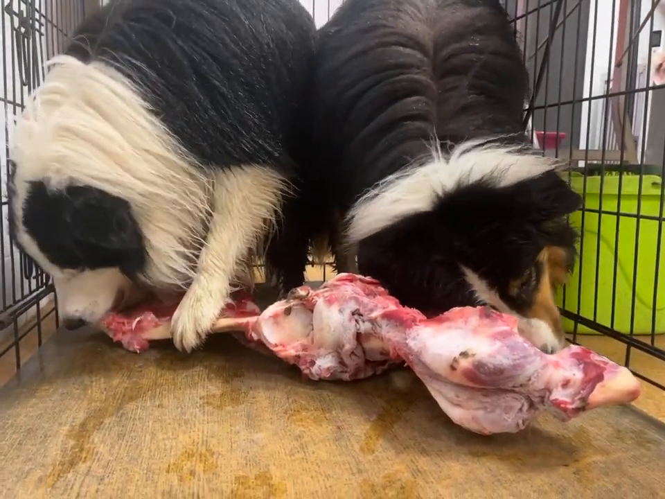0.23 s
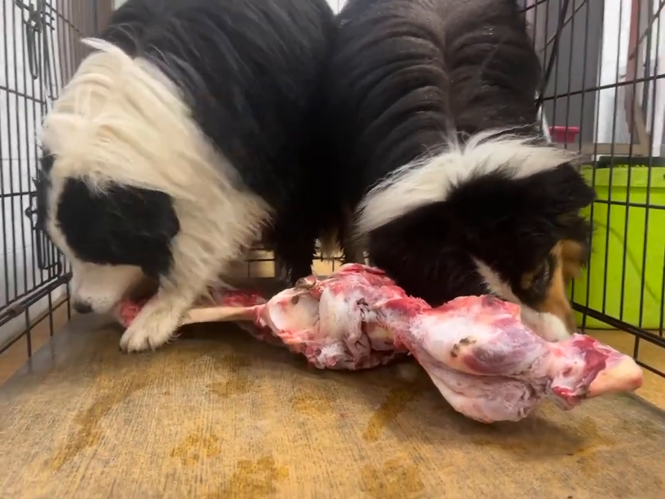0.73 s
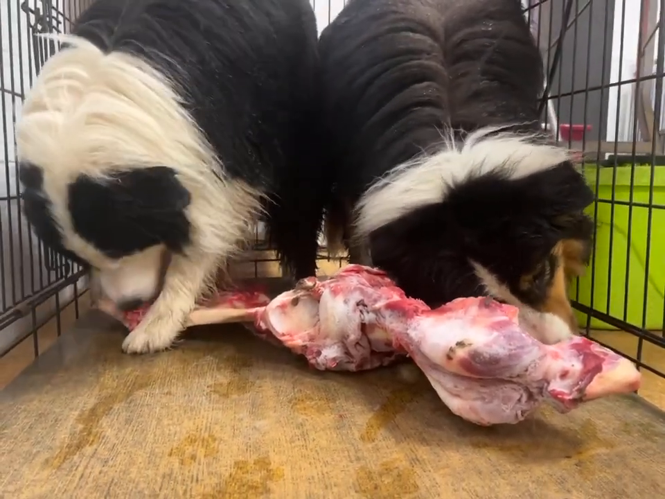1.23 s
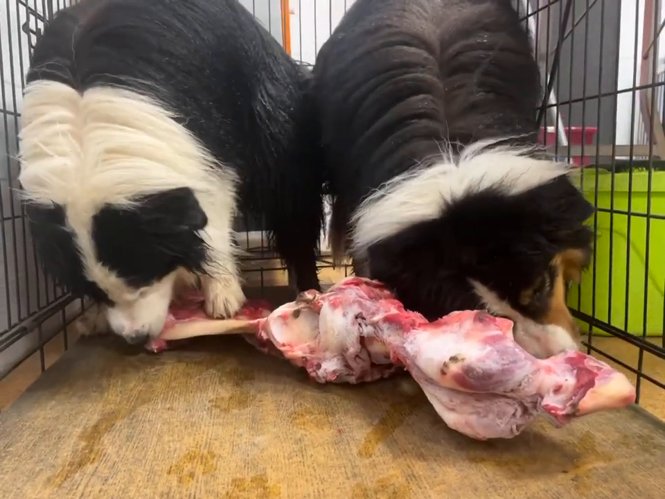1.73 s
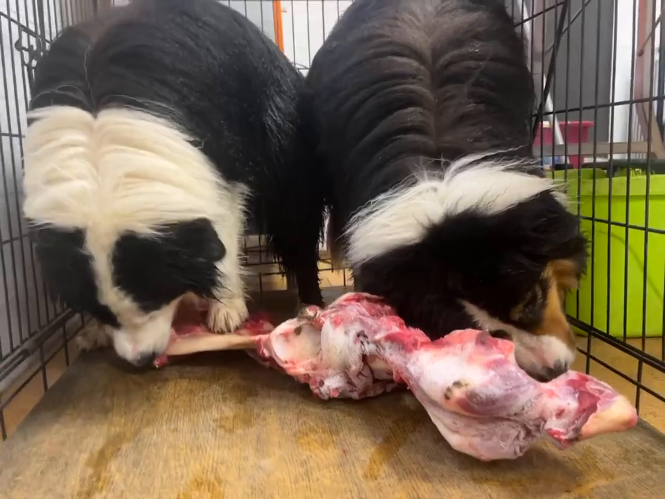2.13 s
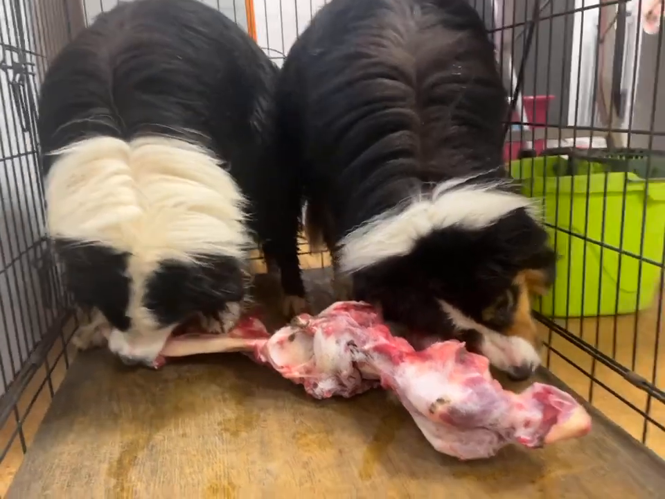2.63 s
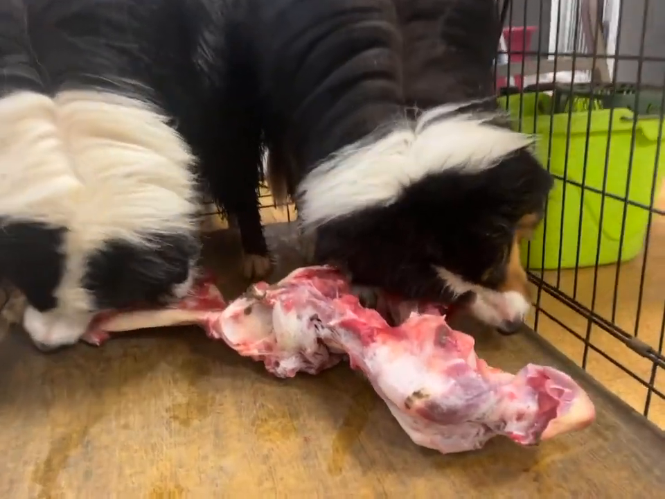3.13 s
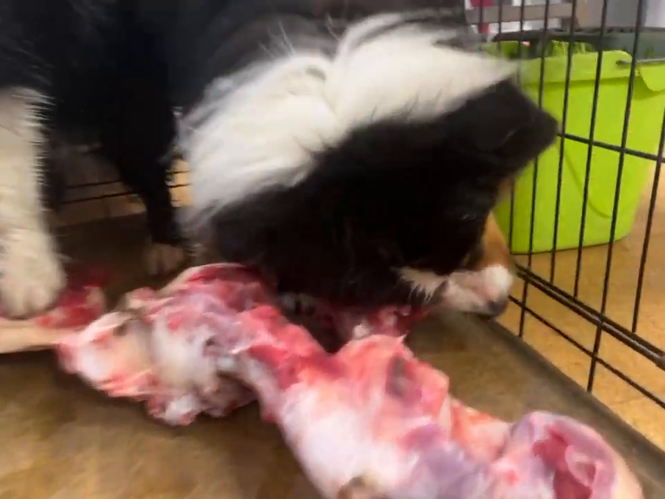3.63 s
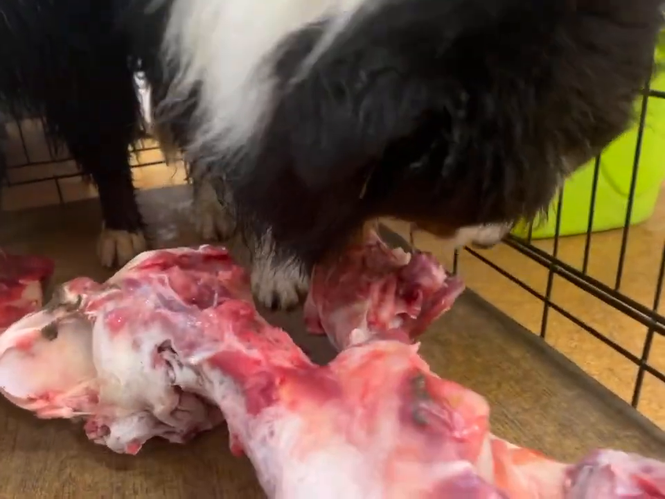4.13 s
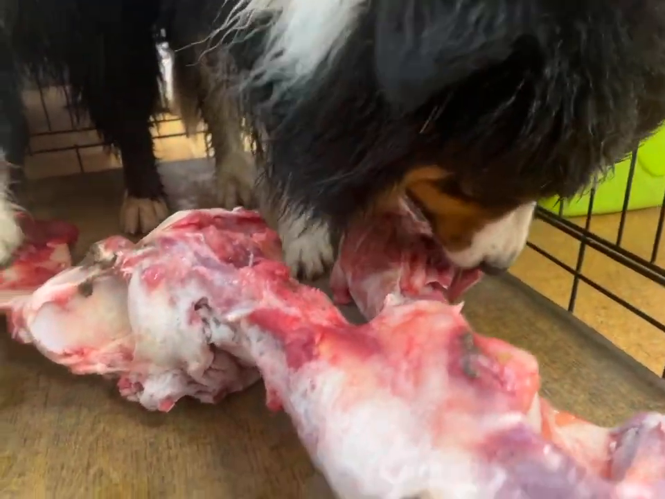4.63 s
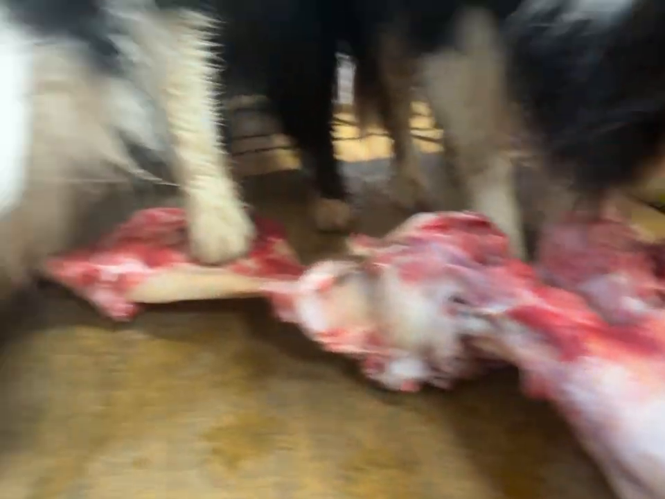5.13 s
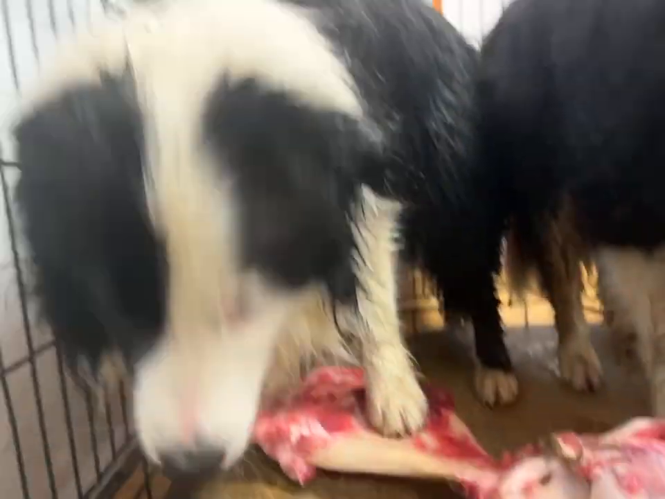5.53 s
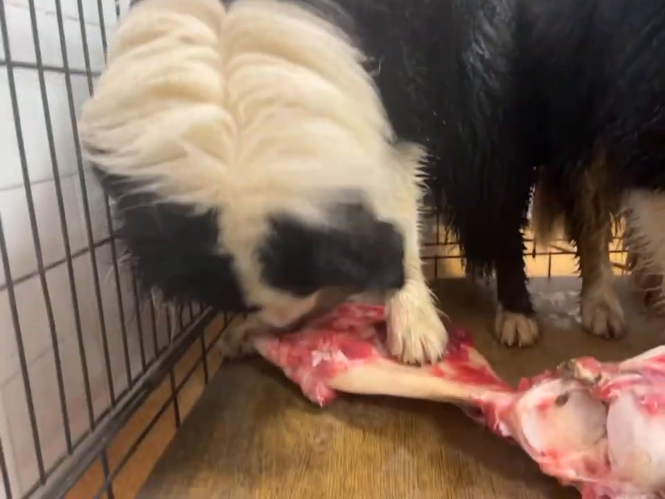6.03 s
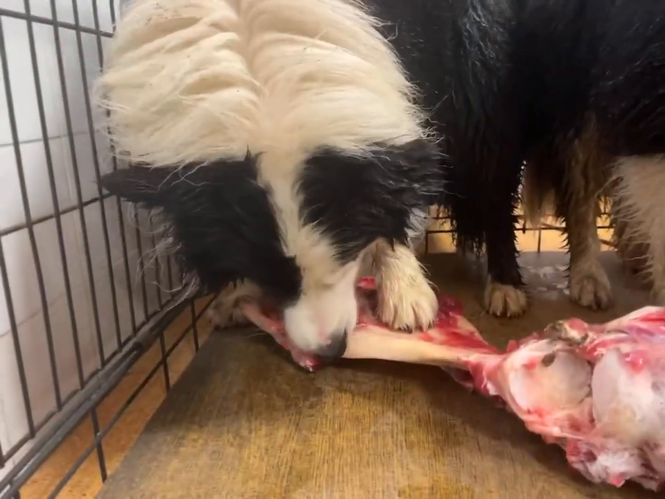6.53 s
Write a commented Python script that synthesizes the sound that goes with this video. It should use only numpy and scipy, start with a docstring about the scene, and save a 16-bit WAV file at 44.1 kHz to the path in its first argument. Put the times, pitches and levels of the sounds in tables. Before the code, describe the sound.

Heard close in a small room with a short reverberation, dogs gnaw a large raw bone on a wooden board. From 0 to 0.6 seconds small clicks and crunches lead with a sharp crack at 0.2. At about 0.7 comes the loudest cluster of bright, hard snaps, with another strong hollow clack at 1.1 and a crunch at 1.3. Irregular tooth slips continue to 2.4, with a soft bone bump near 1.7. From 2.5 to 4 there is fainter grinding, shuffling and a swell of wet, furry rubbing. At 4.1 the bone bangs loudly on the board with a crunch and a woody low ring; a lesser knock follows at 4.6. Afterwards it grows quieter: faint scrapes and ticks, then a quick flurry of dull hollow cracks at 5.9 to 6.3, a last click at 6.6 and rising rubbing. A soft low rumble persists throughout.

```python
"""Teeth slip and crack on a large raw bone that dogs gnaw on a wooden board indoors.
Slips excite dying modes of hollow, shaft and tooth edge; crunches and gnawing are grainy coloured noise.
The bone thuds on the board, whose low modes arrive last; fur and meat rub as patchy bright noise.
A low noise rumble lies beneath, and sparse decaying taps add the room to teeth and board."""
import sys
import numpy as np
from scipy import signal
from scipy.fft import rfft, irfft
from scipy.io import wavfile
from scipy.ndimage import uniform_filter1d

SR = 44100
rng = np.random.default_rng(int(sys.argv[2]) if len(sys.argv) > 2 else 0)


def dump(signal):
    """Clip the signal to [-1, 1] and save it as 16-bit WAV at the path in sys.argv[1]."""
    limited = np.clip(np.atleast_2d(signal).T, -1, 1)
    pcm = np.round(limited * 32767).astype(np.int16)
    wavfile.write(sys.argv[1], SR, pcm)


N = 299439

# teeth slipping off bone: (time [s], peak before high-pass [dB], hollow ring [Hz], hollow weight [dB],
# edge weight [dB], shaft ring [Hz], edge ring [Hz])
CRACKS = [(0.018, -32.5, 1410, -7, -34, 2700, 3410), (0.195, -29, 1440, -8, -7, 2900, 5450),
          (0.203, -16, 1454, -7.5, -6.5, 2840, 5440), (0.423, -30, 1100, -37, 0, 2400, 3180),
          (0.496, -36.5, 1070, -20, -33, 2400, 3900), (0.508, -36.5, 940, -1, -34, 2400, 3900),
          (0.6667, -13.5, 1420, -5.5, -5.5, 2420, 5360), (0.6999, -10, 1960, -16, 3, 3150, 3840),
          (0.7025, -12.5, 1792, -6.5, 2.5, 2220, 4030), (0.9, -37.5, 1250, -40, 11, 2370, 3660),
          (0.991, -35.5, 1280, -1, -25, 2400, 3900), (1.087, -32, 1350, -4, -18, 2700, 3530),
          (1.092, -23, 1336, -4, -7, 2750, 3680), (1.1043, -17.5, 1420, -3.5, -5.5, 2350, 4000),
          (1.305, -25, 1020, -20, -5.5, 3400, 4100), (1.441, -33, 1460, -15, -1, 1840, 3830),
          (1.542, -26.5, 1277, -2.5, -10, 2740, 4060), (1.5471, -22, 1225, -4.5, -9, 2730, 4230),
          (1.698, -30, 1295, -4, -6.5, 2730, 4170), (1.731, -27.5, 700, -4.5, -14, 1480, 3880),
          (1.807, -33, 1270, -10, -5.5, 2680, 3800), (1.827, -28, 1400, -4, -12, 1810, 3440),
          (1.988, -26.5, 1465, -4, -9, 2410, 3820), (2.017, -34, 1210, -7.5, -5, 2200, 5560),
          (2.215, -38, 1930, -15, -3.5, 2200, 3900), (2.225, -35.5, 1160, 2, 4, 2400, 3860),
          (2.381, -24.5, 1206, -1.5, -7.5, 2450, 3460), (2.934, -36.5, 1200, -1, -18, 2300, 3800),
          (2.944, -35.5, 1140, -8, -10, 2300, 3600), (3.212, -31.5, 1320, -10, -6, 1850, 3700),
          (3.476, -31.5, 1005, -6.5, -5, 2000, 3940), (4.033, -39, 1010, -1, -25, 1700, 3900),
          (4.576, -36.5, 860, -8.5, -22, 2000, 3930), (4.796, -40, 744, -31, 4, 2630, 4400),
          (5.095, -35.5, 935, -5, -7.5, 2280, 4200), (5.249, -45.5, 1293, -1.5, -17, 2430, 3900),
          (5.442, -39.5, 1130, -6, -8, 2500, 4400), (5.453, -35, 1370, -14.5, -5, 2690, 4300),
          (5.8059, -33.5, 1000, -20, -6.5, 2360, 3530), (5.943, -33.5, 920, -1, -1, 2400, 3350),
          (5.952, -34, 916, -3, -20, 2250, 3370), (6.078, -26.5, 1025, -4, -41, 2200, 3300),
          (6.106, -23.5, 1075, -11, -19, 2480, 3120), (6.119, -37, 1280, 0, -22, 2470, 3310),
          (6.174, -31.5, 1060, -8.5, -3.5, 2080, 3270), (6.199, -39, 1120, -18, -9, 2500, 3400),
          (6.215, -38, 1280, -11, -20, 2440, 3400), (6.264, -38, 1250, -15, -32, 2260, 3400),
          (6.641, -31, 1090, 0.5, -35, 2380, 3900)]
# modes of bone hollow: (multiple of hollow ring [1], level [dB], t60 [s])
HOLLOW_MODES = [(1, 0, .023), (1.1, -9, .012)]
# upper modes of bone shaft: (multiple of shaft ring [1], level [dB], t60 [s])
SHAFT_MODES = [(1, 0, .006), (.83, -7, .004), (1.2, -6, .004)]
# modes of tooth edge and splinters: (multiple of edge ring [1], level [dB], t60 [s])
EDGE_MODES = [(1, 0, .0034), (1.2, -6, .0024), (1.4, -8, .002), (1.8, -15, .002), (2.4, -16, .0015),
              (3.3, -21, .001)]
# dense runs of small fractures: (time [s], rms before envelope [dB], fade length [s],
# centre [Hz], width [octaves])
CRUNCHES = [(0.052, -49, 0.018, 1490, 0.81), (0.188, -42.5, 0.016, 2000, 0.95),
            (0.351, -47.5, 0.0035, 3170, 0.43), (0.282, -40.5, 0.017, 2220, 0.81),
            (0.487, -45, 0.038, 1140, 0.38), (0.648, -42, 0.023, 1400, 0.11),
            (0.651, -38, 0.019, 2720, 0.32), (0.698, -32, 0.019, 2440, 0.46),
            (1.303, -35, 0.03, 1280, 1.05), (1.67, -46.5, 0.023, 2460, 0.71),
            (2.171, -50, 0.0068, 2110, 0.2), (2.269, -52, 0.005, 2800, 0.78),
            (2.282, -59, 0.062, 1270, 0.17), (2.457, -52.5, 0.094, 3620, 1.6),
            (2.49, -55, 0.088, 1020, 0.17), (2.652, -57, 0.098, 1170, 0.13),
            (2.788, -47, 0.044, 1280, 1.86), (2.79, -42.5, 0.03, 4500, 0.51),
            (2.946, -47.5, 0.028, 1156, 0.14), (3.344, -59.5, 0.12, 1125, 0.13),
            (3.446, -55.5, 0.051, 2500, 0.97), (4.107, -42, 0.063, 2420, 1.2),
            (4.35, -52.5, 0.017, 3100, 0.66), (4.457, -52, 0.013, 4800, 0.4),
            (4.107, -34, 0.063, 870, 1.06), (4.636, -47, 0.054, 1450, 0.81),
            (4.686, -56.5, 0.074, 2210, 0.16), (4.862, -58, 0.065, 3400, 0.41),
            (5.195, -64, 0.087, 3600, 0.33), (5.445, -47, 0.015, 4430, 0.14),
            (5.755, -58.5, 0.026, 1500, 0.91), (5.801, -55, 0.081, 2420, 0.22),
            (5.799, -49.5, 0.011, 750, 0.65), (5.941, -51, 0.03, 1120, 1.4), (6.078, -36, 0.009, 880, 1.05),
            (6.104, -41, 0.018, 1400, 1.05), (6.504, -56.5, 0.08, 800, 0.74),
            (6.52, -61.5, 0.14, 3280, 0.15), (6.572, -56.5, 0.081, 1040, 0.62),
            (6.648, -55, 0.081, 1200, 0.094), (6.707, -51, 0.008, 2000, 0.3),
            (6.735, -55, 0.033, 1350, 0.53)]
# steady movement: (time [s], rumble level before swell [dB], gnawing level before swell [dB])
MOVES = [(0.0, -54.5, -63), (0.64, -54.5, -58.5), (0.98, -54, -61.5), (1.23, -52.5, -60), (2.21, -55, -61),
         (2.5, -50, -55.5), (2.7, -53.5, -58.5), (3.1, -57, -63.5), (3.38, -55, -62.5), (3.93, -57.5, -60),
         (4.18, -54, -60.5), (4.69, -52.5, -62), (5.26, -61, -69), (5.75, -63, -68.5), (6.01, -62, -67.5),
         (6.49, -61, -67), (6.79, -55, -62)]
# relative spectrum of teeth grinding on bone: (frequency [Hz], density [dB per Hz])
GNAW_SPECTRUM = [(400, -27), (520, -15.5), (644, -26), (787, -6.5), (1100, 0.5), (1600, -1.5),
                 (5000, -11.5), (8000, -60)]
# fur and meat rubbing: (time [s], level [dB])
RUBBING = [(0.0, -65.5), (0.34, -67), (0.62, -54.5), (0.87, -67.5), (1.72, -60.5), (1.9, -66), (2.5, -53),
           (2.76, -65.5), (3.65, -55.5), (4.25, -66.5), (4.52, -59), (4.78, -70), (4.92, -59), (5.3, -76.5),
           (5.46, -57), (5.73, -76.5), (5.94, -65.5), (6.4, -73), (6.58, -58.5), (6.68, -65), (6.79, -52.5)]
# relative spectrum of rubbing: (frequency [Hz], density [dB per Hz])
RUSTLE_SPECTRUM = [(880, -44), (1500, -5), (2840, -2.5), (3720, -1), (8880, -2), (15100, -8.5)]
# bone landing on board: (time [s], peak before high-pass [dB], upper-mode boost [dB],
# contact decay, floored at 1 ms [s])
THUDS = [(1.057, -41, 20, 0.02), (1.284, -42.5, 8, 0.045), (1.731, -25, -3, 0.032),
         (2.132, -44.5, -17, 0.024), (2.524, -38, -17, 0.035), (2.785, -37, 3, 0.026),
         (3.246, -36, -22, 0.024), (3.45, -44, 2, 0.084), (4.107, -5.5, 8, 0.00089),
         (4.25, -36, -10, 0.011), (4.6384, -12, -2.5, 0.0012), (4.783, -44, -3, 0.011),
         (6.366, -51, -3, 0.0082), (6.638, -41, 6, 0.0093)]
# modes of the board: (frequency [Hz], level [dB], t60 [s], signed first swing [1])
BOARD_MODES = [(60, -21, 0.11, 1), (121, -5, 0.17, -1.2), (171.5, -2, 0.13, 0.98), (226, -4, 0.09, -1.3),
               (274.6, 0, 0.16, 1), (310, -3, 0.18, 1), (366.3, -4.5, 0.19, 1), (408, -10, 0.15, 0.93),
               (516, -0.5, 0.03, 0.91), (640, -3.5, 0.022, -1.4), (825, -4, 0.048, -1.01),
               (933, -10.5, 0.04, -1), (1337, -8.5, 0.022, 0.92)]
# relative spectrum of rumble through the board: (frequency [Hz], density [dB per Hz])
RUMBLE_SPECTRUM = [(25, -24), (60, 8), (81, 7), (115, 3), (255, -6), (465, -9), (600, -7), (752, -10.5),
                   (900, -9.5), (1170, -44)]
# room decay: (frequency [Hz], t60 [s])
ROOM_DECAY = [(150, 0.29), (400, 0.65), (1040, 0.48), (2760, 0.35), (7280, 0.21)]

# tiny slips around a crack
SLIP_SHARE, CREEP_S, SLIP_S = .6, .0011, .002
# faint slips; level above gnawing
NIBBLES_PER_S, NIBBLE_DB, NIBBLE_SPREAD_DB = 9, 12.5, 3
# longer crunches are smoother and hold their level
GRAIN_SPREAD_DB, SMOOTH_S, HOLD_PER_S = 4, .13, 40
# uneven pressure of paws and jaws
SWELL_PER_S, RUMBLE_SWELL_DB, GNAW_SWELL_DB = 7, 1.8, 3.2
GNAW_PATCH_DB, RUSTLE_PATCH_DB = 3.5, 1.8
RUSTLE_PER_S, RUSTLE_DEPTH_DB = 180, 2.2
# hiss of splinters and wet meat, and its bright first puff; level re crack peak at edge weight >= 0 dB
SPRAY_DB, SPRAY_T60_S = -33, 0.26
PUFF_DB, PUFF_T60_S = -30, 0.032
SPRAY_GRAINS_PER_S, SPRAY_GRAIN_DB = 400, 4
# wet ticks; median level re rubbing, before high-pass
SPIT_PER_S, SPIT_DB, SPIT_HZ = 14, 9, 7500
# delay of a 300 Hz board mode, growth toward the bass, build-up
LAG_S, LAG_POWER, SWELL_CYCLES = .0024, 1.9, 0.26
IN_STEP_S = .0053  # common zero of board-mode phases after touch
TEETH_ROOM_DB, BOARD_ROOM_DB = -11.0, -16.5
EDGE_HZ = 15900


def cracks():
    """A clean slip amid tiny ones rings hollow, shaft and tooth edge."""
    out, t = np.zeros(N), np.arange(600) / SR
    release_s = t[90]
    rows = list(CRACKS) + nibbles()
    tiny_slips = rng.standard_normal((len(rows), 600)) * (rng.random((len(rows), 600)) < .06)
    for (s, db, hollow_hz, hollow_db, edge_db, shaft_hz, edge_hz), slips in zip(rows, tiny_slips):
        decay_s = np.where(t < release_s, CREEP_S, SLIP_S)
        drive = SLIP_SHARE * slips * np.exp(-abs(t - release_s) / decay_s)
        drive[90] = 1  # the tooth creeps, then lets go
        hollow, edge = gain_of(hollow_db), gain_of(edge_db)
        shaft = np.sqrt(max(1 - hollow ** 2 - edge ** 2, .03))
        parts = [(hollow, hollow_hz, HOLLOW_MODES), (shaft, shaft_hz, SHAFT_MODES),
                 (edge, edge_hz, EDGE_MODES)]
        sound = 0
        for weight, base_hz, table in parts:
            modes = [(base_hz * k, level_db, t60_s) for k, level_db, t60_s in table]
            answer = ring(modes, count=1500, rise_s=0.37 / modes[0][0])
            sound = sound + weight * peaked(signal.fftconvolve(drive, answer))
        add(out, s + .0003 - release_s, gain_of(db) * peaked(sound))
    return high_pass(out, 550, order=2)  # cracks are thin, with little below 550 Hz


def nibbles():
    """Faint slips at chance times follow the gnawing level; rows as in CRACKS."""
    draw = rng.random((round(NIBBLES_PER_S * N / SR), 7))
    s = draw[:, 0] * N / SR
    gnaw_db = np.interp(s, *np.transpose(MOVES)[[0, 2]])
    db = gnaw_db + NIBBLE_DB + NIBBLE_SPREAD_DB * (2 * draw[:, 1] - 1)
    return list(zip(s, db, 900 + 550 * draw[:, 2], -20 * draw[:, 3], -25 * draw[:, 4],
                    1900 + 1000 * draw[:, 5], 3300 + 2000 * draw[:, 6]))


def crunches():
    """Small fractures make uneven noise grains with quick start, fading end and one spectral hump."""
    out, hz = np.zeros(N), np.fft.rfftfreq(16384, 1 / SR) + 1
    for s, db, length_s, centre_hz, octaves in CRUNCHES:
        spread_db = GRAIN_SPREAD_DB * np.exp(-length_s / SMOOTH_S)
        grain_gain = gain_of(spread_db * rng.standard_normal(256)).repeat(64)
        grains = rng.standard_normal(16384) * grain_gain
        colour = np.exp(-.5 * (np.log2(hz / centre_hz) / max(octaves, .05)) ** 2)
        u = np.arange(16384) / SR / length_s
        envelope = np.minimum(u / 0.052, 1) * np.exp(-u ** (2 + HOLD_PER_S * length_s))
        add(out, s, gain_of(db) * evened(irfft(rfft(grains) * colour)) * envelope)
    return out


def gnawing():
    """Teeth grinding on bone: noise and uneven slips, in patches of pitch and time."""
    grind = coloured(grainy(per_s=140, spread_db=4.0, share=0.19), GNAW_SPECTRUM)
    level = gain_of(track(MOVES, 2))
    return level * patchy(grind, GNAW_PATCH_DB) * flutter(SWELL_PER_S, GNAW_SWELL_DB)


def rubbing():
    """Fur and meat rub as fluttering noise, joined by the spray of cracks and wet ticks."""
    noise = rng.standard_normal(N) * flutter(RUSTLE_PER_S, RUSTLE_DEPTH_DB)
    hairs = patchy(coloured(noise, RUSTLE_SPECTRUM), RUSTLE_PATCH_DB)
    level = gain_of(track(RUBBING, 1))
    return np.hypot(level, spray()) * hairs + level * spit()


def spray():
    """Each listed crack leaves a bright puff and a dying, grainy hiss, as a gain."""
    starts, t = np.zeros(N), np.arange(SR // 2) / SR
    for s, db, _, _, edge_db, *_ in CRACKS:  # dull cracks splinter less
        add(starts, s, gain_of([2 * db + min(edge_db, 0)]))
    # powers, hence doubled dB
    hiss = gain_of(2 * (SPRAY_DB - 60 * t / SPRAY_T60_S))
    puff = gain_of(2 * (PUFF_DB - 60 * t / PUFF_T60_S))
    power = abs(signal.fftconvolve(starts, hiss + puff)[:N])
    return np.sqrt(power) * flutter(SPRAY_GRAINS_PER_S, SPRAY_GRAIN_DB)


def spit():
    """Sparse wet ticks, each a high-passed noise burst decaying in about a millisecond."""
    size = gain_of(SPIT_DB + 5 * rng.standard_normal(N)) * (rng.random(N) < SPIT_PER_S / SR)
    envelope = np.convolve(size, np.exp(-np.arange(200) / 40))[:N]
    return high_pass(rng.standard_normal(N) * envelope, SPIT_HZ, order=3)


def thuds():
    """The bone lands in uneven contacts; bending waves in the board bring low modes last."""
    out, t = np.zeros(N), np.arange(2600) / SR
    u = np.arange(12000) / SR
    contacts = rng.standard_normal((len(THUDS), 2600)) * (rng.random((len(THUDS), 2600)) < .007)
    for (s, db, hard_db, contact_s), touches in zip(THUDS, contacts):
        drive = 0.4 * touches * np.exp(-t / max(contact_s, 1e-3))
        drive[0] = 1
        drive = np.convolve(drive, np.hanning(24))  # meat softens each contact
        board = np.zeros(20000)
        for hz, mode_db, t60_s, side in BOARD_MODES:
            top_db = hard_db * np.clip((hz - 700) / 500, 0, 1)
            lag_s = LAG_S * (300 / hz) ** LAG_POWER
            build_up = 1 - np.exp(-u * hz / SWELL_CYCLES)
            swing = side * np.sin(2 * np.pi * hz * (u + lag_s - IN_STEP_S)) * build_up
            add(board, lag_s, gain_of(mode_db + top_db - 60 * u / t60_s) * swing)
        add(out, s - .0015, gain_of(db) * peaked(signal.fftconvolve(drive, board)))
    return high_pass(out, 48, order=3)


def rumble():
    """Shuffling heard through the board: low noise with sparse slips, swelling unevenly."""
    low = coloured(grainy(per_s=30, spread_db=1.0, share=0.11), RUMBLE_SPECTRUM)
    return gain_of(track(MOVES, 1)) * low * flutter(SWELL_PER_S, RUMBLE_SWELL_DB)


def room(x):
    """Bands die at their own speed; three echo patterns cycle quickly, so the tail stays even and untuned."""
    out, at = np.zeros(N), np.arange(200, SR // 2 - 20, 20)
    for k in range(3):
        taps = np.zeros(SR // 2)
        taps[at + rng.integers(0, 20, len(at))] = rng.choice([-1., 1.], len(at))
        hz, t, z = signal.stft(taps, SR, nperseg=256)
        decay = gain_of(-60 * t / read(ROOM_DECAY, hz)[:, None])
        tail = signal.istft(z * decay, SR, nperseg=256)[1]
        # signed shares at 15 Hz, total power constant
        share = np.sqrt(2 / 3) * np.cos(np.pi * (np.arange(N) / SR * 30 + k / 3))
        out += signal.fftconvolve(x * share, tail / np.linalg.norm(tail))[:N]
    return out


def ring(modes, count, rise_s):
    """Dying modes answer one tap, with an exponential rise."""
    t = np.arange(count) / SR
    sound = sum(gain_of(db - 60 * t / t60_s) * np.sin(2 * np.pi * hz * t) for hz, db, t60_s in modes)
    return sound * (1 - np.exp(-t / rise_s))


def grainy(per_s, spread_db, share):
    """Smooth noise mixed by power share with sparse slips of uneven size."""
    sizes = gain_of(spread_db * np.minimum(rng.exponential(1, N), 5))
    slips = sizes * (rng.random(N) < per_s / SR) * rng.choice([-1., 1.], N)
    return np.sqrt(1 - share) * rng.standard_normal(N) + np.sqrt(share) * evened(slips)


def coloured(x, spectrum):
    """Filters a signal by the spectrum, at rms 1."""
    return evened(irfft(rfft(x) * gain_of(read(spectrum, np.fft.rfftfreq(N, 1 / SR))), N))


def patchy(x, depth_db):
    """Random gain patches, some hundred Hz by some ten ms, at rms 1."""
    z = signal.stft(x, nperseg=512)[2]
    over_time = uniform_filter1d(rng.standard_normal(z.T.shape), size=9, axis=0)
    patches = uniform_filter1d(over_time, size=7, axis=1)
    return evened(signal.istft(z * gain_of(depth_db * evened(patches).T), nperseg=512)[1][:N])


def flutter(per_s, depth_db):
    """Random swelling between knots, as a gain."""
    knots = np.arange(0, N + SR, SR / per_s)
    return gain_of(depth_db * np.interp(np.arange(N), knots, rng.standard_normal(len(knots))))


def track(table, column):
    """Interpolates a table column over time."""
    columns = np.transpose(table)
    return np.interp(np.arange(N) / SR, columns[0], columns[column])


def read(points, hz):
    """Interpolates a table over log frequency."""
    f, value = np.transpose(points)
    return np.interp(np.log(hz + 1), np.log(f + 1), value)


def high_pass(x, hz, order):
    """Butterworth high-pass."""
    return signal.sosfilt(signal.butter(order, hz, "high", fs=SR, output="sos"), x)


def gain_of(db):
    """Converts dB to amplitude."""
    return 10 ** (np.asarray(db) / 20)


def evened(x):
    """Scales to rms 1."""
    return x / np.sqrt(np.mean(x ** 2) + 1e-20)


def peaked(x):
    """Scales to peak 1."""
    return x / (np.abs(x).max() + 1e-12)


def add(mix, s, sound):
    """Adds a sound at a time in seconds, cut at the end of the mix."""
    part = mix[max(round(s * SR), 0):][:len(sound)]
    part += sound[:len(part)]


def scene():
    """Sums teeth, board, their room, rubbing and rumble."""
    teeth, board = cracks() + crunches(), thuds()
    echoes = room(gain_of(TEETH_ROOM_DB) * teeth + gain_of(BOARD_ROOM_DB) * board)
    return (teeth + board + echoes + gnawing() + rubbing() + rumble())[None]


def record(dry):
    """The microphone drops the deepest bass; then the band limit."""
    thinned = high_pass(dry, 42, order=4)
    band_limit = signal.firwin(511, EDGE_HZ, window=("kaiser", 9), fs=SR)
    return signal.oaconvolve(thinned, band_limit[None], "same")


dry = scene()
out = record(dry)
dump(out)
```